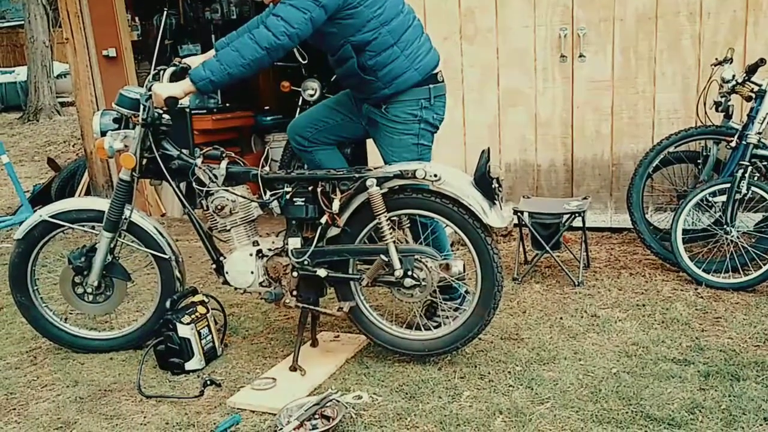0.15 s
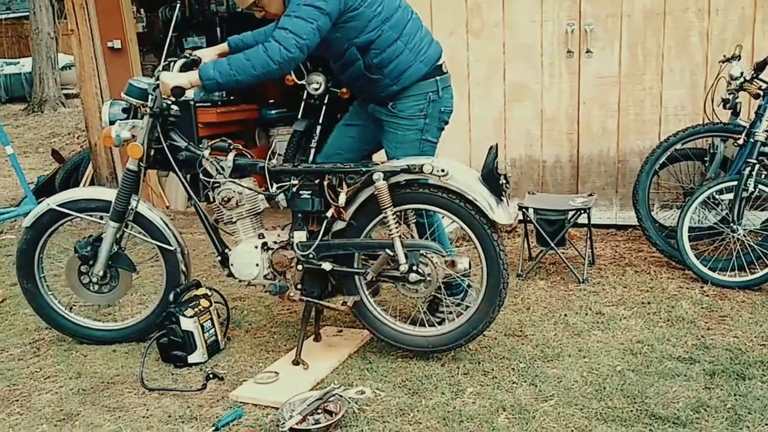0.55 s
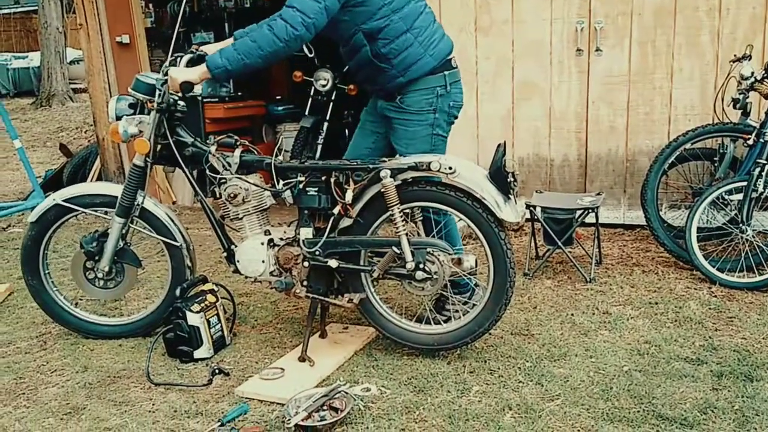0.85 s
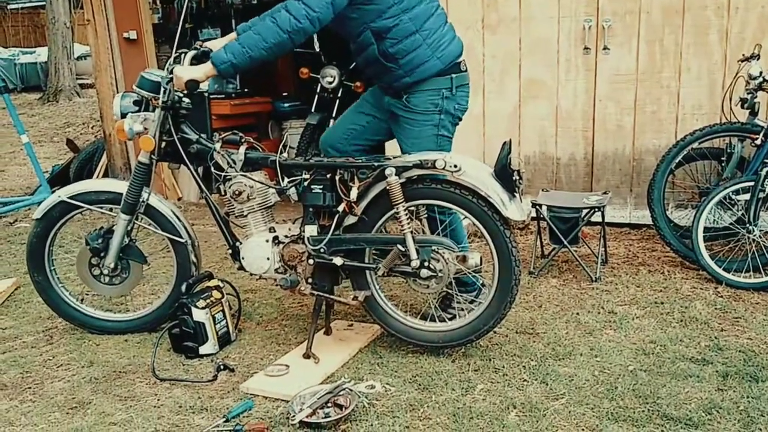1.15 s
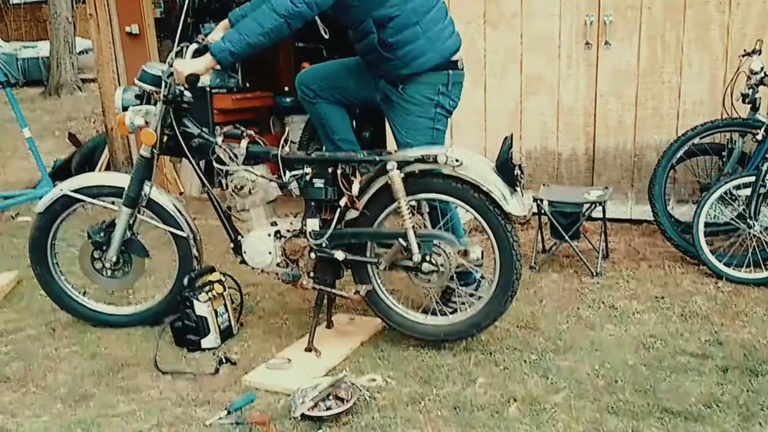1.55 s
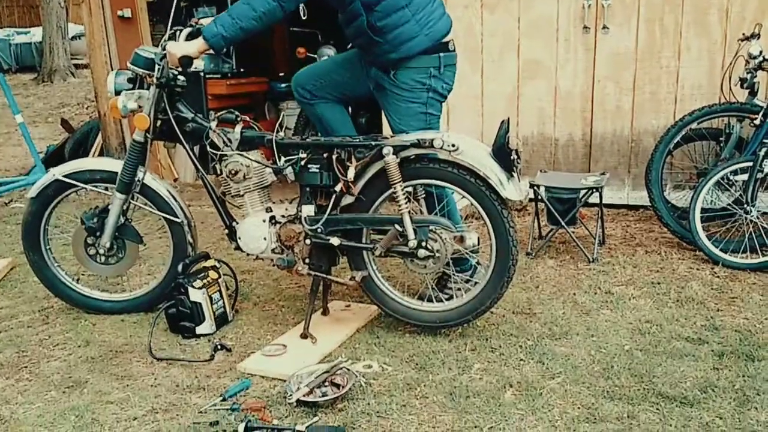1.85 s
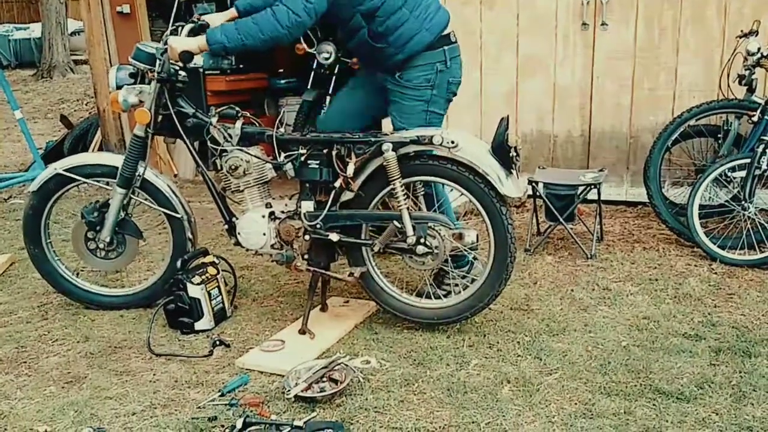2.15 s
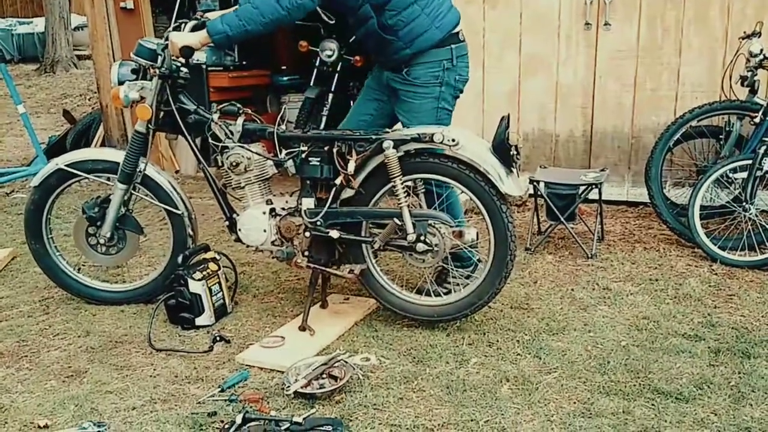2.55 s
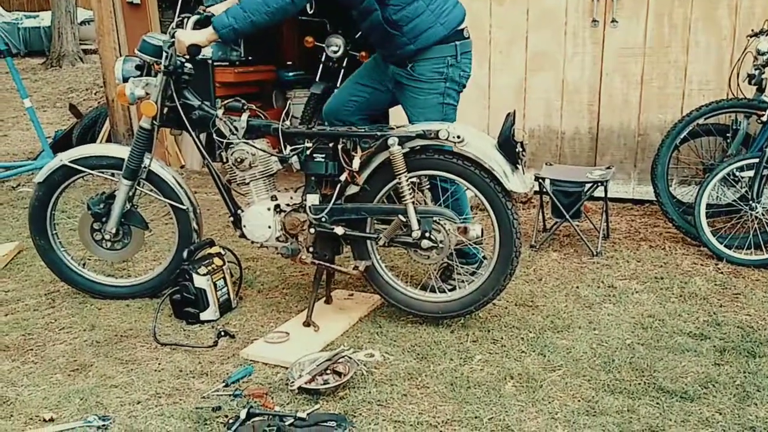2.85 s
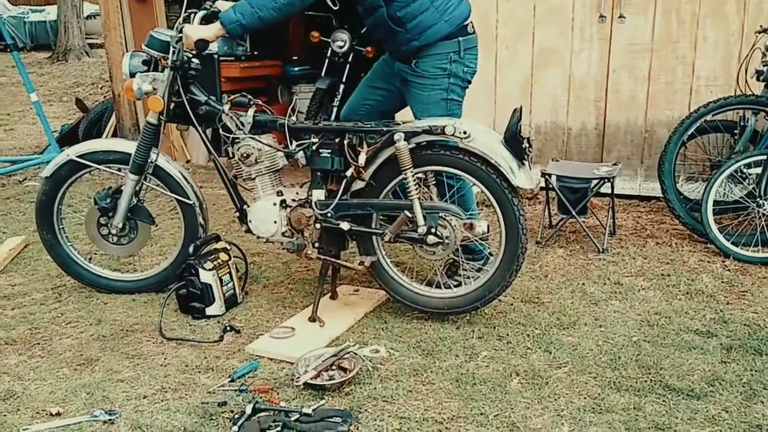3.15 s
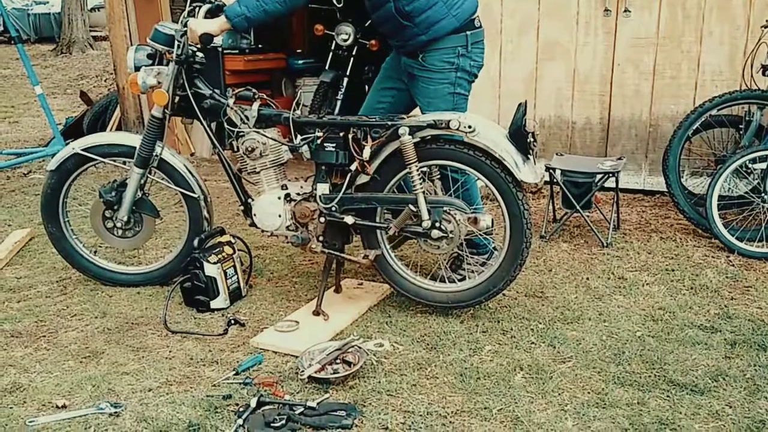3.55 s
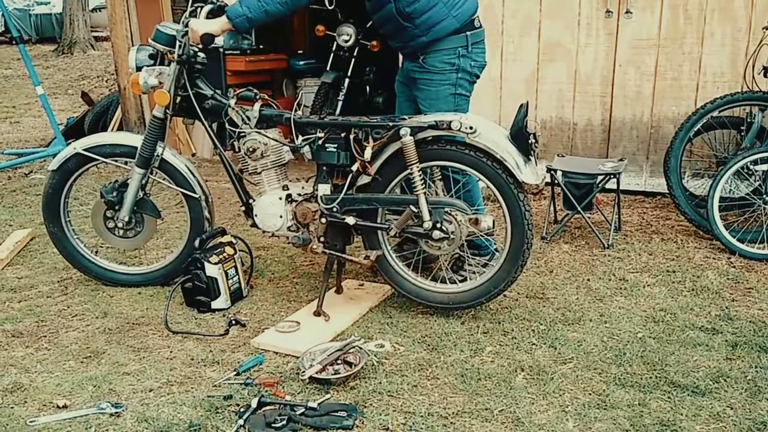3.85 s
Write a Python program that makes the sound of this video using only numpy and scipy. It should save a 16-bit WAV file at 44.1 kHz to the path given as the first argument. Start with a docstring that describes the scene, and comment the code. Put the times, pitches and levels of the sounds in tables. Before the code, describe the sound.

A small motorcycle is kick-started outdoors. The first kick clanks and chuffs without catching. After a few light knocks, a second kick makes the engine cough, catch and run unevenly, with rapid exhaust pulses and metallic rattling.

```python
"""A small single-cylinder motorcycle is kick-started in a garden beside a wooden shed, over a faint rumble.
First the lever scrapes and clanks, ringing the frame; this kick only pumps air, and a spring pings.
On the second kick the engine coughs and catches, each stroke sending a gas pulse down the resonant
exhaust pipe and shaking the valve gear and loose metal. Finally it runs unevenly, firing and coasting
by turns. Throughout, shed and fence scatter short echoes."""
import sys
import numpy as np
from scipy import signal
from scipy.fft import rfft, irfft
from scipy.io import wavfile

SR = 44100
rng = np.random.default_rng(int(sys.argv[2]) if len(sys.argv) > 2 else 0)


def dump_mix(stems):
    """Bounce the given channels to the path in sys.argv[1] as a 16-bit WAV at rate SR."""
    frames = np.atleast_2d(stems).T  # one column per channel
    limited = np.clip(frames, -1, 1)  # hard clip at full scale
    pcm = np.round(limited * 32767).astype(np.int16)
    wavfile.write(sys.argv[1], SR, pcm)


N = 176400

# outdoor rumble spectrum: frequency_hz, relative_db
RUMBLE_SPECTRUM = [(25, -23), (60, -1), (117, 1.5), (180, -9), (280, -13), (480, -37.5), (900, -47)]
# the lever rubbing under the foot: start_s, length_s, pitch_hz, level_db
LEVER_SCRAPES = [(0.17, 0.2, 1940, -79), (0.65, 0.11, 1040, -55.5), (2.544, 0.11, 1300, -33)]
# continuous chain and gear rattle: time_s, level_db
RATTLE_LEVEL = [(.62, -86.5), (.74, -37), (.79, -46.5), (.87, -35), (.95, -41.5), (1.01, -47.5),
                (1.08, -65.5), (2.28, -108), (2.31, -41.5), (2.40, -28), (2.49, -34), (2.54, -24),
                (2.80, -24.5), (3.0, -27), (3.11, -34), (3.21, -34.5), (3.25, -26.5), (3.35, -23),
                (4, -25.5)]
# knocks of lever, ratchet and stand: start_s, clank_db, clink_db, decay_ms
LEVER_KNOCKS = [(0.711, -36, -60, 11), (.719, -43.5, -19.5, 2.9), (0.758, -27, -16, 20),
                (0.771, -17.5, -18, 20), (0.81, -30, -36, 13), (0.85, -29, -28.5, 37),
                (0.977, -31, -28, 29), (1.026, -38, -33, 11), (1.074, -44, -33, 5.4),
                (1.11, -40.5, -50, 32), (1.193, -50, -49, 11), (1.296, -59, -78, 24), (1.514, -48, -52, 18),
                (1.549, -37.5, -39, 17), (1.726, -51.5, -68, 21), (1.783, -47.5, -73, 19),
                (2.296, -41.5, -37, 25), (2.357, -25.5, -17, 12), (2.391, -15.5, -18.5, 12),
                (2.442, -26, -18, 22)]
# strokes while the engine is kicked over and coughs: start_s, burn_share, puff_db, clatter_db
SLOW_STROKES = [(0.737, 0.27, -4.5, -27), (0.826, 0.1, -1, -8.5), (0.9417, 0, -2.5, -43.5),
                (2.328, 0.03, -2, -46.5), (2.418, 0.1, -4.5, -12.5), (2.513, 1, -4.5, 3),
                (2.574, 0.18, -7, -24.5), (2.645, 0.82, -0.5, 4), (2.7, 0.72, -6.5, 4), (2.759, 0.7, -1, 5),
                (2.81, 0.87, -13, 3), (2.867, 0.76, -0.5, 4), (2.920, 0.26, 1.5, 1.5),
                (2.983, 0.14, 1, 1.5), (3.056, 0.2, 0.5, -27), (3.136, 0.13, 1.5, -20),
                (3.231, 1, -3.5, 4.5), (3.290, 1, -4.5, 5.5)]
# crank shakes between slow strokes: start_s, clatter_db
CRANK_SHAKES = [(2.593, -4.5), (3.07, -1), (3.156, -4)]
# speed of the running engine: time_s, stroke_rate_hz
RUN_SPEED = [(3.337, 26.3), (3.41, 30.1), (3.51, 28.5), (3.58, 24.8), (3.666, 24), (3.746, 28.8),
             (3.85, 29.3), (3.92, 25.6)]
# its combustion, from coasting (0) to full firing (1): time_s, burn_share
RUN_BURN = [(3.44, 0.79), (3.48, 0.13), (3.55, 0), (3.585, 0.48), (3.625, 0), (3.665, 0.87), (3.85, 0.68),
            (3.885, 0.02)]
# valve and chain taps within a stroke: cycle_share, relative_db
VALVE_TAPS = [(0, 0), (.27, -.5), (.55, -2), (.8, -5)]
# spectra of the engine case and of thin metal: frequency_hz, relative_db
CASE_SPECTRUM = [(350, -3), (770, -15), (940, -2), (1300, -5.5), (2900, -5.5), (4500, -2), (16000, -19)]
THIN_SPECTRUM = [(400, -35), (2000, -11.5), (3000, -7.5), (7000, -7), (9300, -2), (11200, 1), (12500, -4.5),
                 (15500, -6.5)]
# resonances common to both: pitch_hz, t60_s, relative_db
METAL_MODES = [(1258, 0.018, -1), (1452, 0.13, 1.5), (2895, 0.016, -1)]
# stereo width of the clatter: frequency_hz, side_to_mid_db
CLATTER_WIDTH = [(100, -26), (800, -29.5), (2000, -8.5), (4500, 0.5)]
# modes of the frame and of the cylinder head: pitch_hz, t60_s, level_db
FRAME_MODES = [(1015, 0.25, -21), (1255, 0.15, -16.5), (1486, .19, -20), (2340, .2, -26), (2950, .24, -21),
               (3590, 0.37, -29)]
HEAD_MODES = [(1753, 0.065, -34.5), (1868, 0.087, -35), (2536, 0.042, -37.5), (2750, 0.16, -45)]
# exhaust pulses, at a sound speed ratio of 1:
# size_db, rise_ms, round_trip_ms, echo_share, echo_cutoff_hz, silencer_hz, silencer_q, leak_share
SLOW_FIRED = (17, .53, 7.6, .74, 660, 106, 4, .15)
SLOW_UNFIRED = (2.5, 1.1, 8.9, 0.73, 1400, 105, 2, 0.033)
RUNNING_FIRED = (8.7, 0.5, 7.16, 0.8, 380, 87, 1.06, 0.16)
RUNNING_UNFIRED = (14.4, 0.78, 9.04, 0.65, 2700, 140.4, 9.8, 0.015)

CONTACT_MS, TAP_MS, CASE_MS = .6, 6, 17
TAP_DB, TAP_RUN_DB, TAP_BURN_DB, TAP_SCATTER_DB = -14.5, 3, 2.5, 1.8
TAP_LEAD_S, TAP_JITTER_S, SLOW_CYCLE_S = 0.0028, .001, 0.061
CASE_DB, CASE_TAP_DB, CASE_RATTLE_DB = -34.5, -29.5, -4
ECHO_CLATTER_DB, ECHO_EXHAUST_DB = -12, -39.5
FFT_HZ = np.fft.rfftfreq(2 * N, 1 / SR)


def undb(db):
    """Amplitude ratio of a level in decibels."""
    return 10 ** (np.asarray(db) / 20)


def curve(points, at):
    """Linear interpolation through a table."""
    return np.interp(at, *np.array(points).T)


def colour(spectrum):
    """Gain of a spectrum table, interpolated on a log-frequency axis."""
    hz, db = np.array(spectrum).T
    return undb(np.interp(np.log(FFT_HZ + 1), np.log(hz), db))


def shaped(x, gain):
    """Linear filtering, normalised to conserve the power of white noise."""
    return irfft(rfft(x, 2 * N) * gain / np.sqrt(np.mean(abs(gain) ** 2)))[:N]


def resonance(hz, centre_hz, q):
    """Band-pass response of a damped oscillator, gain 1 at its centre."""
    u = 1j * hz / centre_hz
    return u / q / (1 + u / q + u * u)


def add(track, start_s, sound):
    """Superposition: a sound adds to the track from its start time."""
    i = int(np.clip(start_s * SR, 0, N))
    part = sound[:N - i]
    track[i:i + len(part)] += part


def rumble(level_db=-48.5, side_db=-4):
    """Filtered noise: a faint low outdoor rumble, partly correlated between left and right."""
    gain = colour(RUMBLE_SPECTRUM) / (1 + (FFT_HZ / 1500) ** 2)
    mid, side = (shaped(rng.standard_normal(N), gain) for _ in range(2))
    return undb(level_db) * (mid + undb(side_db) * side * np.array([[1], [-1]]))


def lever_scrapes(slips_per_s=750):
    """Stick-slip friction: a swell of irregular slips drives one resonance of the lever and its gear."""
    out = np.zeros(N)
    for start_s, length_s, pitch_hz, db in LEVER_SCRAPES:
        force = np.zeros(N)
        add(force, start_s, undb(db) * np.sqrt(np.hanning(int(length_s * SR))))
        slipping = rng.random(N) < slips_per_s / SR
        slips = slipping * rng.standard_normal(N) * np.sqrt(SR / slips_per_s)
        out += shaped(force * slips, resonance(FFT_HZ, pitch_hz, q=4.4) ** 2)
    return out


def impact_power(db, decay_ms):
    """Damping: the power of an impact builds quickly, then decays exponentially."""
    ms = np.arange(SR // 5) / SR * 1000
    return undb(db) ** 2 * np.exp(-2 * ms / decay_ms) * (1 - np.exp(-ms / CONTACT_MS))


def contact_powers():
    """Incoherent sources add in power: rattle, knocks and valve taps on the case and on thin metal."""
    thin = undb(curve(RATTLE_LEVEL, np.arange(N) / SR)) ** 2
    case = thin * undb(CASE_RATTLE_DB) ** 2
    for t, clank_db, clink_db, decay_ms in LEVER_KNOCKS:
        add(case, t, impact_power(clank_db, decay_ms))
        add(thin, t, impact_power(clink_db, decay_ms))
    for t, db in CRANK_SHAKES:
        add(thin, t, impact_power(TAP_DB + db, CASE_MS))
    strokes = [(t, SLOW_CYCLE_S, db) for t, _, _, db in SLOW_STROKES]
    strokes += [(t, cycle_s, TAP_RUN_DB + TAP_BURN_DB * burn) for t, cycle_s, burn in running_strokes()]
    for t, cycle_s, db in strokes:
        add(case, t - TAP_LEAD_S, impact_power(CASE_DB + db, CASE_MS))
        for share, tap_db in VALVE_TAPS:
            late, hard = rng.standard_normal(2)
            tap_s = t - TAP_LEAD_S + share * cycle_s + TAP_JITTER_S * late * (share > 0)
            blow_db = TAP_DB + db + tap_db + TAP_SCATTER_DB * hard
            add(thin, tap_s, impact_power(blow_db, TAP_MS))
            add(case, tap_s, impact_power(blow_db + CASE_TAP_DB, TAP_MS))
    return case, thin


def panel_response():
    """Modal overlap: brief, crowded treble resonances of mudguards and brackets give a ragged response."""
    tail = np.sqrt(impact_power(0, decay_ms=4)) * rng.standard_normal(SR // 5)
    share = .5 * FFT_HZ / (FFT_HZ + 2000)
    return 1 + share * rfft(tail / np.sqrt(np.sum(tail ** 2)), 2 * N)


def metal_clatter(power, spectrum, grain_db=2.3):
    """Forced vibration: gritty contacts drive the metal; the treble differs between left and right."""
    ring = 1 + sum(undb(db) / (1 + 2j * np.pi * (FFT_HZ - pitch_hz) * t60_s / np.log(1000))
                   for pitch_hz, t60_s, db in METAL_MODES)
    body = colour(spectrum) * ring
    grit = undb(grain_db * np.repeat(rng.standard_normal(N // 12), 12))
    force = np.sqrt(power / np.mean(grit ** 2)) * grit
    mid, side = (shaped(force * rng.standard_normal(N), body * panel_response()) for _ in range(2))
    width = colour(CLATTER_WIDTH)
    channels = [rfft(mid, 2 * N) + sign * width * rfft(side, 2 * N) for sign in (1, -1)]
    return np.array([irfft(channel / np.sqrt(1 + width ** 2))[:N] for channel in channels])


def strike(modes, db, scatter_db=2.5, detune=.012):
    """Free vibration: a blow excites damped modes, each time in a new mix and slightly retuned."""
    t, ring = np.arange(SR // 3) / SR, 0
    deviations, phases = rng.standard_normal((len(modes), 2)), rng.random(len(modes))
    for (hz, t60_s, mode_db), (hard, sharp), phase in zip(modes, deviations, phases):
        envelope = undb(db + mode_db + scatter_db * hard) * np.exp(-np.log(1000) * t / t60_s)
        ring += envelope * np.sin(2 * np.pi * (hz * (1 + detune * sharp) * t + phase))
    return ring * (1 - np.exp(-t * 1000 / CONTACT_MS))


def frame_ring(ring_db_per_db=0.91):
    """Impact excitation: each knock rings the frame, light knocks more in proportion than hard ones."""
    out = np.zeros(N)
    for t, clank_db, _, _ in LEVER_KNOCKS:
        add(out, t, strike(FRAME_MODES, ring_db_per_db * clank_db))
    return out


def head_ring(burn_db=8, run_db=4, valve_db=-12):
    """Modal ringing: strokes excite the cylinder head, harder when fired; once running, so do taps."""
    out = np.zeros(N)
    for t, burn, _, _ in SLOW_STROKES:
        add(out, t - TAP_LEAD_S, strike(HEAD_MODES, burn_db * burn))
    for t, cycle_s, burn in running_strokes():
        add(out, t - TAP_LEAD_S, strike(HEAD_MODES, burn_db * burn + run_db))
        for share, tap_db in VALVE_TAPS[1:]:
            add(out, t - TAP_LEAD_S + share * cycle_s, strike(HEAD_MODES, valve_db + tap_db))
    return out


def puff(kind, speed_ratio, size=16384):
    """Pipe resonance: a gas pulse reflects end to end and rings the silencer and its small chamber."""
    db, rise_ms, trip_ms, echo, cutoff_hz, silencer_hz, q, leak = kind
    hz = np.fft.rfftfreq(size, 1 / SR)
    s = 2j * np.pi * hz / 1000  # Laplace variable, per ms
    pulse = s * rise_ms ** 2 / (1 + s * rise_ms) ** 4 * SR / 1000
    pipe = 1 / (1 - echo * np.exp(-s * trip_ms / speed_ratio - (hz / cutoff_hz) ** 2))
    ring = undb(-4.5) * resonance(hz, centre_hz=137.3, q=18)
    silencer = leak + resonance(hz, silencer_hz * speed_ratio, q) + ring
    chamber = 1 + undb(6.5) * resonance(hz, centre_hz=292.5, q=8.3)
    return undb(db) * irfft(pulse * pipe * silencer * chamber)[:size // 2]


def exhaust(heat_speedup=0.29, heat_share=0.6, speed_scatter=.06):
    """Sound travels faster in hot gas: once the engine runs, firings heat the pipe and lift its note."""
    out, heat = np.zeros(N), 0
    # a fired stroke pushes gas out; an unfired one sucks it back
    for t, burn, db, _ in SLOW_STROKES:
        push = burn * puff(SLOW_FIRED, speed_ratio=0.96)
        suck = (1 - burn) * puff(SLOW_UNFIRED, speed_ratio=0.94)
        add(out, t, undb(db) * (push - suck))
    for t, _, burn in running_strokes():
        speed_ratio = 1 + heat_speedup * heat + speed_scatter * rng.standard_normal()
        push = burn * puff(RUNNING_FIRED, speed_ratio)
        suck = (1 - burn) * puff(RUNNING_UNFIRED, speed_ratio=0.94)
        add(out, t, push - suck)
        heat += heat_share * (burn - heat)
    return out


def spring_ping(start_s=.808, pitch_hz=13950):
    """Damped oscillation: a spring gives one thin, high ping during the first kick."""
    out, envelope = np.zeros(N), np.sqrt(impact_power(db=-20, decay_ms=24))
    add(out, start_s, envelope * np.sin(2 * np.pi * pitch_hz * np.arange(len(envelope)) / SR))
    return out


def running_strokes():
    """Period is the inverse of rate: the running engine's strokes as start_s, cycle_s, burn_share."""
    t, rows = RUN_SPEED[0][0], []
    while t < N / SR:
        cycle_s = 1 / curve(RUN_SPEED, t)
        rows.append((t, cycle_s, curve(RUN_BURN, t)))
        t += cycle_s
    return rows


def garden_echoes(x, low_t60_s=0.37, high_t60_s=0.26, split_hz=3500, onset_s=0.004):
    """Diffuse reflection: shed and fence scatter a tail of echoes whose treble dies sooner."""
    t, tail = np.arange(SR) / SR, 0
    for band, t60_s in (("low", low_t60_s), ("high", high_t60_s)):
        sos = signal.butter(2, split_hz, band, fs=SR, output="sos")
        tail += signal.sosfilt(sos, rng.standard_normal(SR)) * np.exp(-np.log(1000) * t / t60_s)
    tail *= np.minimum(t / onset_s, 1)
    return signal.fftconvolve(x, tail / np.sqrt(np.sum(tail ** 2)))[:N]


def scene():
    """Superposition of clatter, exhaust, their echoes and the rumble."""
    case, thin = contact_powers()
    clatter = metal_clatter(case, CASE_SPECTRUM) + metal_clatter(thin, THIN_SPECTRUM)
    clatter += head_ring() + spring_ping() + frame_ring() + lever_scrapes()
    pipe = exhaust()
    scattered = undb(ECHO_CLATTER_DB) * clatter + undb(ECHO_EXHAUST_DB) * pipe
    echoes = np.array([garden_echoes(channel) for channel in scattered])
    return clatter + pipe + echoes + rumble()


def record(dry):
    """Band limiting: a steep low-pass filter removes the treble above 15.9 kHz."""
    return signal.sosfilt(signal.ellip(10, .2, 80, 15900, fs=SR, output="sos"), dry)


dry = scene()
out = record(dry)
dump_mix(out)
```